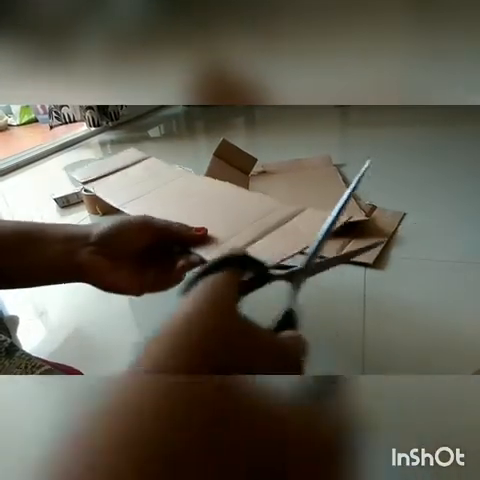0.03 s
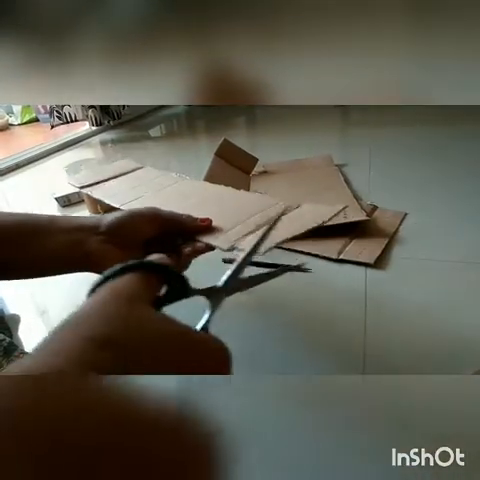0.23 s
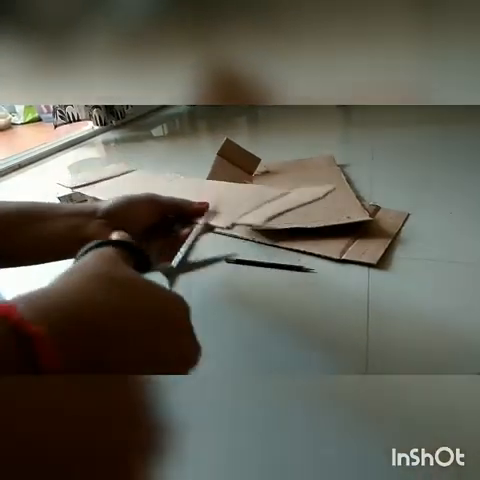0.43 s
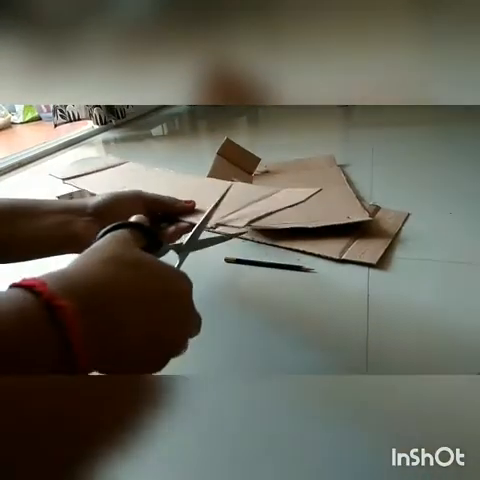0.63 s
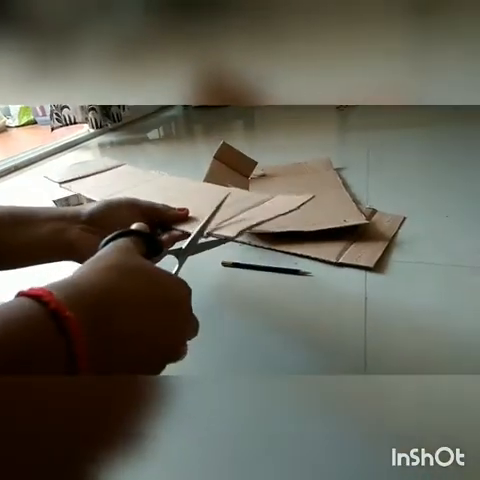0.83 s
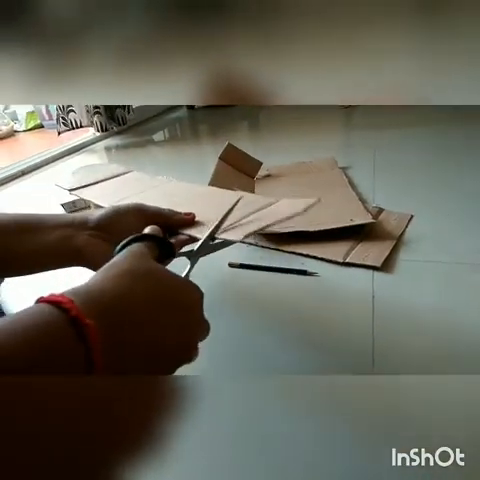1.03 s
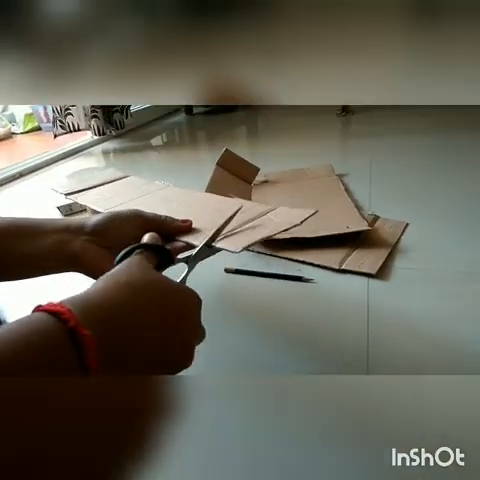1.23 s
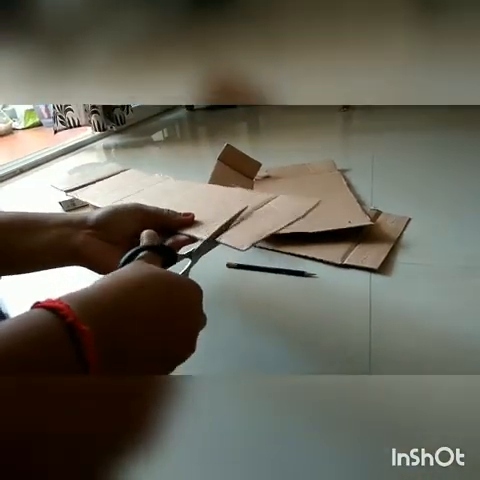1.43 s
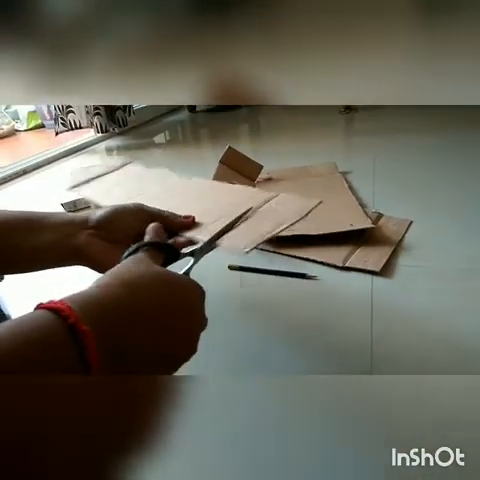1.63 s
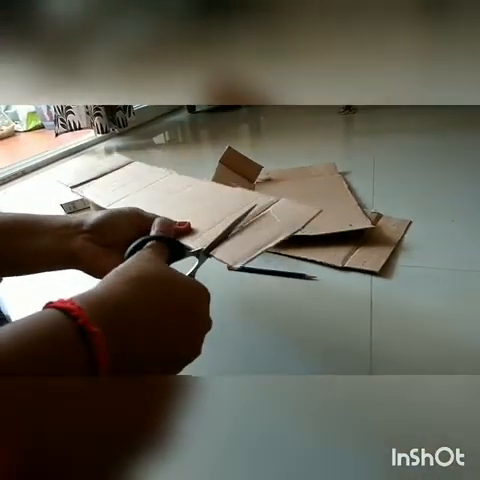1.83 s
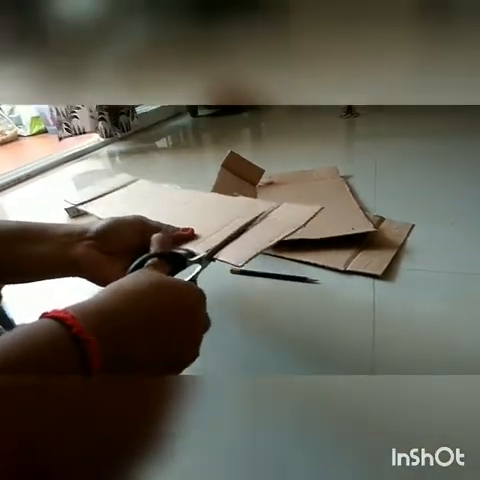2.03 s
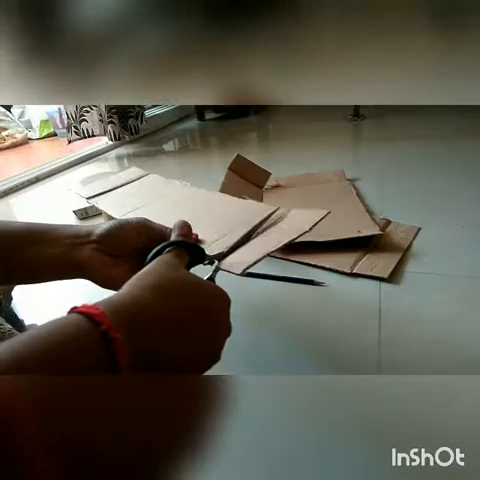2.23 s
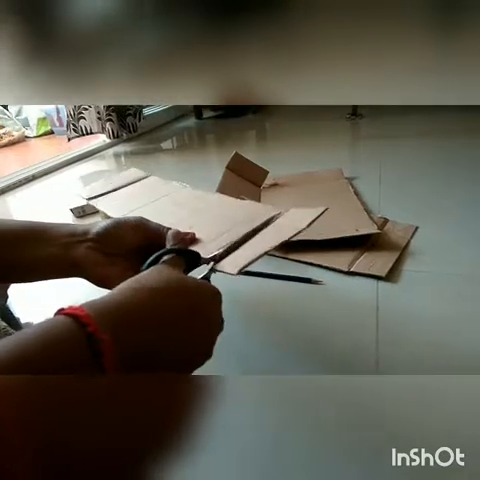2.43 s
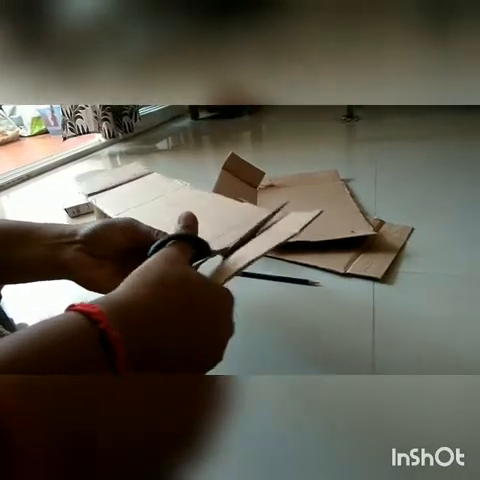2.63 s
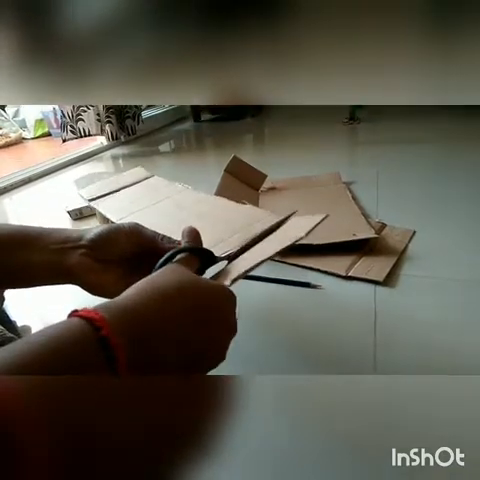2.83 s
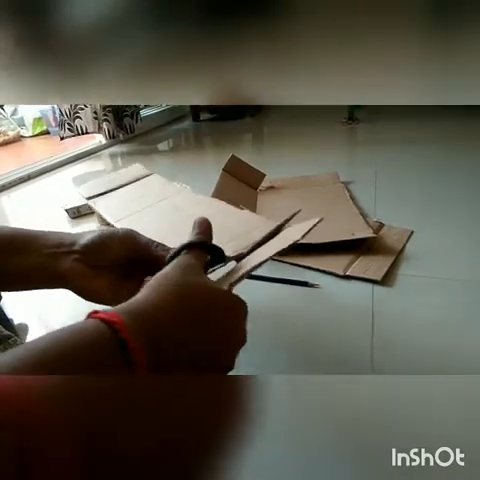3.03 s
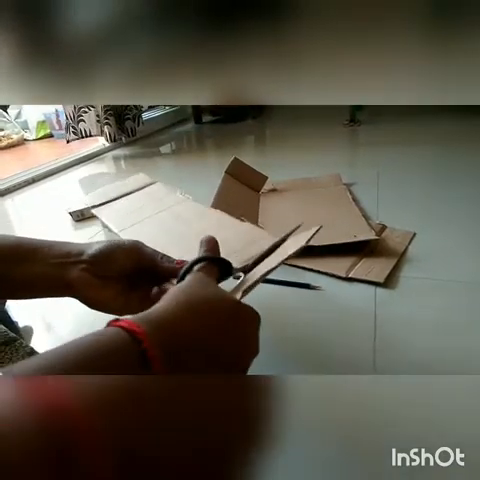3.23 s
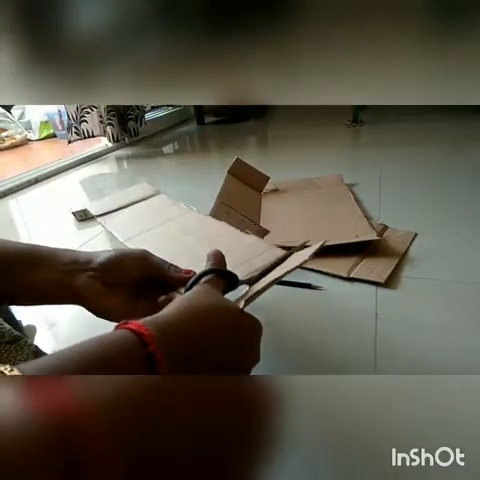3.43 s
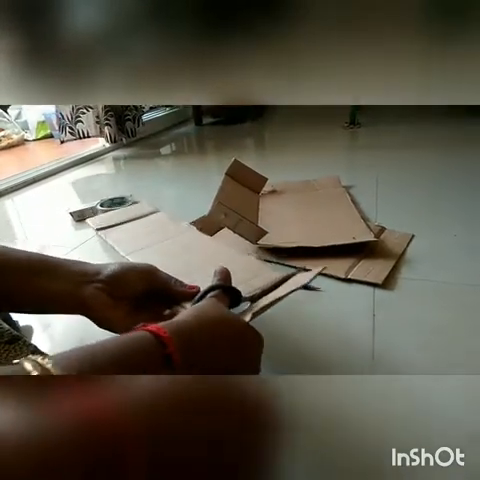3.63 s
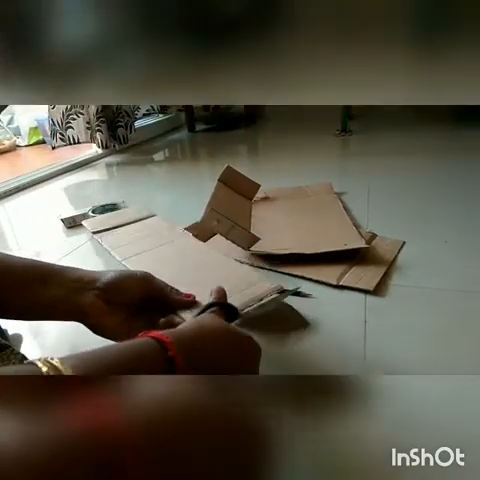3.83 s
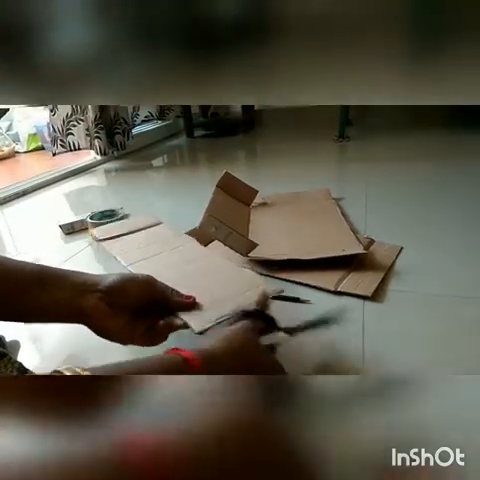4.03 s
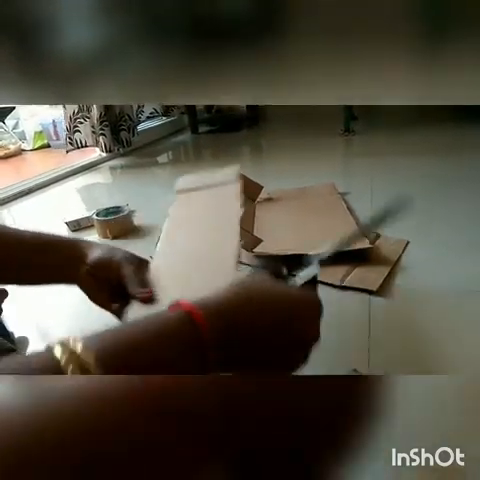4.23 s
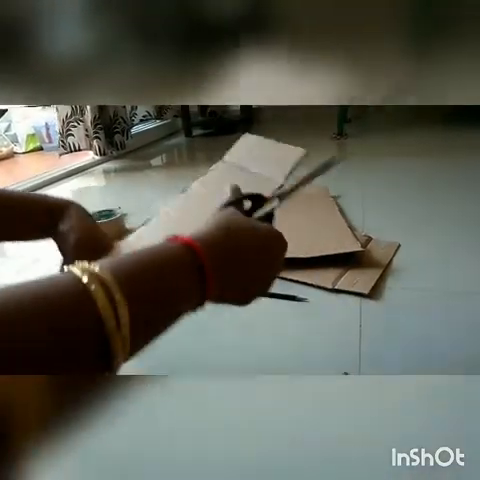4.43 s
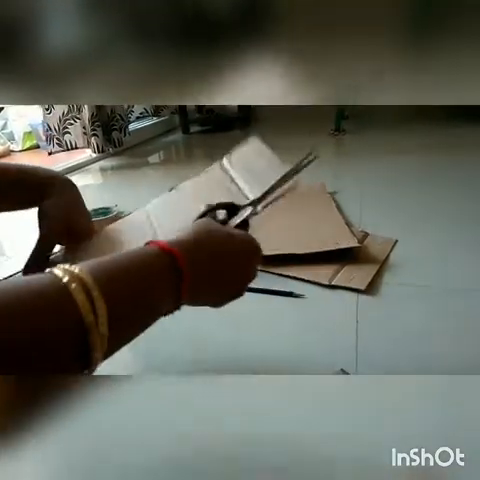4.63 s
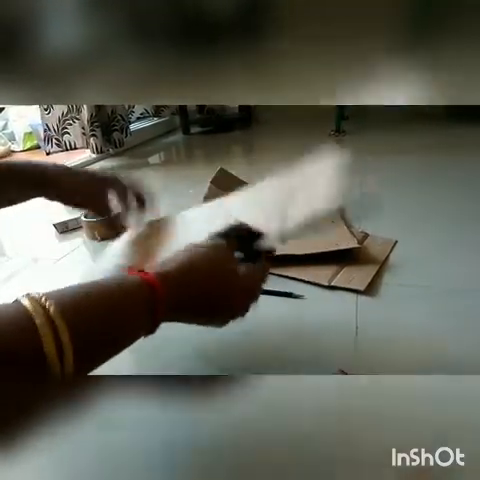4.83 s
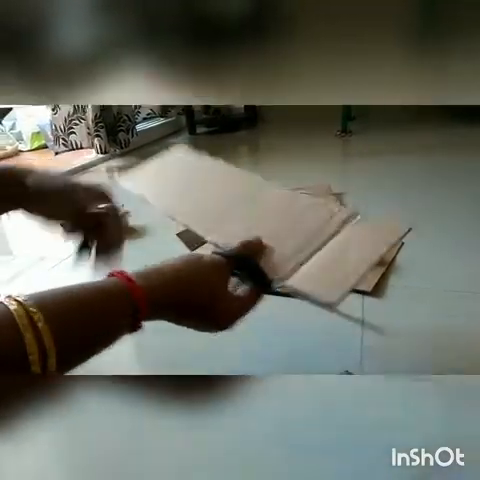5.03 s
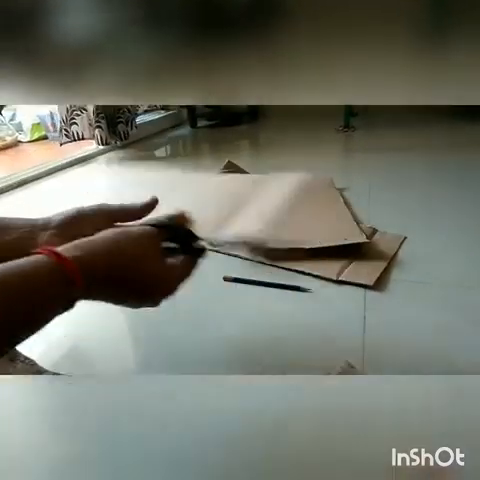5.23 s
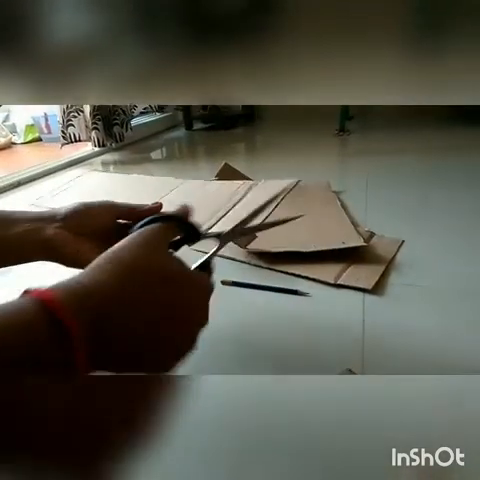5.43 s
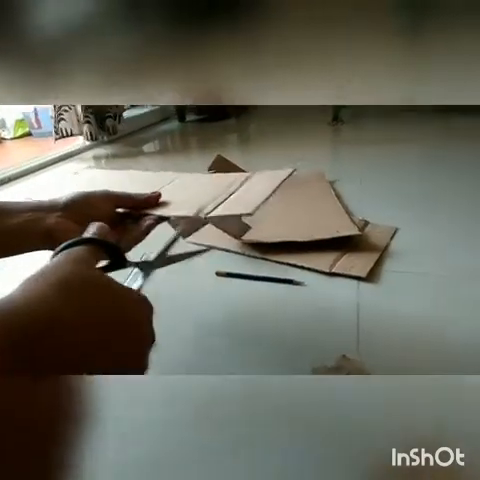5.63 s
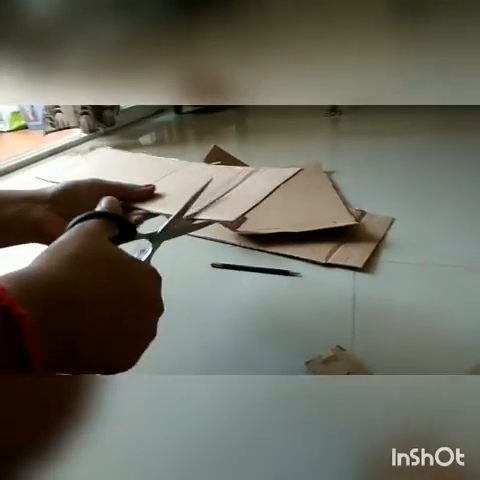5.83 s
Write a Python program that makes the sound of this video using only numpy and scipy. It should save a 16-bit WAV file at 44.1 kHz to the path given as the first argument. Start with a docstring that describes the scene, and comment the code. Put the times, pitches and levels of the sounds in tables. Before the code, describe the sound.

After about a second of muffled distant street noise, dry fibrous snips of scissors in stiff card grow into sharp crackling crunches. A single bright, loud blade snap rings briefly off bare tiles, followed by quick little taps of a fallen piece. Then quiet handling, a hollow card bump and papery scrapes. Close stereo phone pickup, brighter on the left, with low wind-like thumps.

```python
"""A hard, tiled room: close to a phone, scissors bite stroke by stroke through corrugated cardboard. The blades
clap shut, the offcut taps and bounces on the floor, the sheet is turned. Breaking fibres are damped sines
that also drive resonances of the sheet; knocks are decaying tones; decaying noise makes the echoes.
Low-pitched pressure lumps puff at the microphone ports; shaped noise, a hum and a whistle form a far street."""
import sys
import numpy as np
from scipy import signal
from scipy.fft import rfft, irfft, next_fast_len
from scipy.io import wavfile
from scipy.ndimage import uniform_filter1d, map_coordinates

SR = 44100
rng = np.random.default_rng(int(sys.argv[2]) if len(sys.argv) > 2 else 0)


def generate_wav(signal):
    """Clip the signal to [-1, 1] and save it as 16-bit WAV at the path in sys.argv[1]."""
    frames = np.transpose(np.atleast_2d(signal))
    scaled = np.clip(frames, -1, 1) * 32767
    pcm = np.round(scaled).astype(np.int16)
    wavfile.write(sys.argv[1], SR, pcm)


N = 260190

# resonances of the sheet's body: (centre [Hz], width [Hz], gain [dB])
SHEET_MODES = [(500, 170, 10), (918, 300, 19), (1271, 290, -1.5), (1800, 1300, 2)]


def amp(db):
    """Level as a logarithm: decibels to linear gain."""
    return 10 ** (np.asarray(db) / 20)


def unit(x):
    """Normalisation by power: x scaled to rms 1."""
    return x / np.sqrt(np.mean(x ** 2) + 1e-20)


def along(points, hz):
    """Spectral interpolation: (frequency [Hz], value) points joined on a logarithmic axis."""
    f, v = np.transpose(points)
    return np.interp(np.log(hz + 1), np.log(f + 1), v)


def curves(rows):
    """Time envelopes: one value per sample for each column after the time."""
    s, *columns = np.transpose(rows)
    return [np.interp(np.arange(N) / SR, s, column) for column in columns]


def wobble(rate):
    """Band-limited fluctuation: a smooth random curve with `rate` knots per second."""
    knots = rng.standard_normal(int(N * rate / SR) + 4)
    return map_coordinates(knots, [np.arange(N) * rate / SR])


def filtered(x, response):
    """Linear filtering: the spectrum of x times a complex response of frequency."""
    m = next_fast_len(N + SR // 2)
    return irfft(rfft(x, m) * response(np.fft.rfftfreq(m, 1 / SR)), m)[..., :N]


def resonant(x, modes):
    """Modal superposition: x through parallel causal resonances of alternating sign."""
    def response(f):
        total = 0
        for k, (centre, width, db) in enumerate(modes):
            total = total + (-1) ** k * amp(db) * 1j * f * width / (centre ** 2 - f ** 2 + 1j * f * width)
        return total
    return filtered(x, response)


def street():
    """Partial coherence: far traffic through the walls is patchy noise, alike at both ports in the bass."""
    # far noise level: (time [s], level before drift [dB])
    rush_level = [(0, -58), (.7, -60.5), (3, -56), (4.6, -57), (5.9, -54.5)]
    # a low hum that swells once: (time [s], level before wavering [dB])
    hum_level = [(.62, -90), (.8, -61), (1.2, -62.5), (1.4, -99)]
    # faint falling whistle, before wavering: (time [s], pitch [Hz], level [dB])
    whistle = [(0, 2480, -79), (.12, 2430, -70), (.4, 2050, -72), (.62, 1900, -88)]
    # spectral shape of the far noise: (frequency [Hz], relative density [dB])
    spectrum = [(25, -48.5), (60, 2), (200, 1), (520, -1.5), (790, -10.5), (980, -5), (1500, -16),
                (2000, -15), (3200, -22), (6300, -37.5)]
    # coherence of the two ports: (frequency [Hz], left-right correlation [1])
    likeness = [(60, 0.95), (230, 0.9), (460, 0.83), (900, 0.57), (1770, 0)]
    t = np.arange(N) / SR

    # both ports share the same patches of strength in time and frequency
    z = signal.stft(rng.standard_normal((2, N)), nperseg=512)[2]
    field = uniform_filter1d(rng.standard_normal(z.shape[1:]), 3, 0)
    field = uniform_filter1d(field, 10, 1)
    pair = signal.istft(z * amp(2 * unit(field)), nperseg=512)[1][:, :N]

    def mid_side(f):
        # cos(2 angle) is the correlation of mid + side with mid - side
        angle = np.arccos(np.clip(along(likeness, f), -1, 1)) / 2
        return amp(along(spectrum, f)) * [np.cos(angle), np.sin(angle)]

    mid, side = filtered(pair, mid_side)
    drift_db = .6 * wobble(5)
    rush = amp(curves(rush_level)[0] + drift_db) * unit(np.array([mid + side, mid - side]))

    hum = amp(curves(hum_level)[0] + 2 * wobble(12)) * np.sin(2 * np.pi * 64 * t)

    hz, db = curves(whistle)
    phase = 2 * np.pi * np.cumsum(hz * (1 + .022 * wobble(200))) / SR
    flutter_db = np.array([3 * wobble(50), 3 * wobble(50)])  # separate at each port
    sounding = t < whistle[-1][0]
    return rush + hum + sounding * amp(db + flutter_db) * np.sin(phase)


def puffs():
    """Slow pressure fluctuation: lumps of air, weighted between the ports, over faint unrelated buffeting."""
    # air puffing into the ports: (time [s], nominal level [dB], pitch [Hz], left-right difference [dB])
    gusts = [(0.3, -44, 81.6, -30), (2.771, -45, 114, -34), (2.945, -40.5, 94.6, -37), (3.019, -42, 68, 5),
             (3.117, -32, 105, -35), (3.24, -40.5, 93.3, 21), (3.378, -36.5, 75, -34),
             (3.668, -36.5, 101, -40), (4.048, -36, 72.6, -40)]
    swell_s = .009  # time to the top of a puff's envelope
    out, t = np.zeros((2, N + SR)), np.arange(SR // 3) / SR
    for s, db, hz, pan_db in gusts:
        envelope = t / swell_s * np.exp(1 - t / swell_s)
        lump = envelope * np.sin(2 * np.pi * hz * t)
        port_db = np.minimum([[pan_db], [-pan_db]], 0)  # only the weaker port is lowered
        out[:, round(s * SR):][:, :len(t)] += amp(db + port_db) * lump

    low_band = [(25, -39.5), (55, -2.5), (110, -13.0), (300, -53.5)]  # (frequency [Hz], gain [dB])
    low = filtered(rng.standard_normal((2, N)), lambda f: amp(along(low_band, f)))
    gusty = low * amp([4 * wobble(0.77), 4 * wobble(9.2)])
    return out[:, :N] + amp([[-72], [-66]]) * unit(gusty)


def grains(s, hz, size, cycles):
    """Impulsive fracture: one soft-started damped sine per breaking fibre, coloured by the cut edge."""
    # resonances of the cut edge: (centre [Hz], width [Hz], gain [dB])
    edge_modes = [(3100, 1700, 1), (4564, 1070, 3), (5440, 2080, .5)]
    sample = np.arange(96)
    turns = hz[:, None] * sample / SR
    decay = np.exp(-turns / cycles)
    shape = size[:, None] * np.sin(2 * np.pi * turns) * decay * np.minimum(turns, 1)
    places = np.round(s * SR).astype(int)[:, None] + sample
    bare = np.bincount(places.ravel(), shape.ravel(), N + SR)[:N]
    return resonant(bare, edge_modes)


def tearing(count=36000):
    """Stochastic fracture: dense clumped fibre breaks follow each stroke's force and shake the sheet's body."""
    # the blades shear the card: (start [s], length [s], level [dB], pitch [Hz])
    cuts = [(1.088, 0.094, -73.5, 5630), (1.151, 0.11, -65, 5220), (1.277, 0.093, -65.5, 5630),
            (1.328, 0.065, -50.5, 4390), (1.416, 0.22, -55.5, 5460), (1.715, 0.12, -46, 5080),
            (1.936, .07, -55.5, 5800), (1.993, 0.082, -48.5, 5800), (2.21, 0.1, -42, 5140),
            (2.413, 0.055, -42.5, 5430), (2.466, 0.064, -47, 5300), (2.655, .095, -40.5, 4900),
            (2.815, 0.12, -41, 4530), (3.048, .12, -44.5, 4650), (3.268, 0.094, -59.5, 4600),
            (3.343, .06, -53.5, 4950), (3.66, 0.24, -69, 4780)]
    # hands and steel rub over the sheet: (start [s], length [s], level [dB], pitch [Hz])
    rubs = [(-.4, 0.99, -76.5, 4390), (4.26, 0.036, -67, 4520), (4.314, 0.059, -70.5, 3950),
            (4.504, 0.13, -60.5, 4500), (4.553, 1.84, -70, 4260), (4.625, 0.29, -58, 4430),
            (4.768, 0.18, -64, 4720), (4.917, 0.076, -65, 4370), (5.093, 0.31, -69, 4240),
            (5.335, 0.077, -51.5, 4660), (5.403, 0.078, -51, 4780), (5.479, 0.11, -59, 4690),
            (5.645, .17, -61.5, 4230)]
    cut_rise, rub_rise = .3, .45  # share of a stroke spent swelling
    cut_rough, rub_rough = 1.1, .6  # how unevenly the breaks come
    softness = 1.4  # exponent rounding a stroke's ends
    wander = .06  # log-pitch straying of neighbouring breaks together

    t = np.arange(N) / SR
    force, pitch, rough = np.zeros(N), np.full(N, 4600.), np.ones(N)
    strokes = [(*row, cut_rise, cut_rough) for row in cuts]
    strokes += [(*row, rub_rise, rub_rough) for row in rubs]
    for start, length, db, hz, rise, uneven in sorted(strokes):
        ramp = np.interp((t - start) / length, [0, rise, 1], [0, 1, 0])
        force += amp(db) * np.sin(np.pi / 2 * ramp) ** softness
        pitch[t > start], rough[t > start] = hz, uneven  # held until the next stroke

    draw = rng.random((count, 2))
    at = (draw[:, 0] * N).astype(int)
    spread = np.exp(.17 * rng.standard_normal(count))
    own_hz = (pitch * np.exp(wander * wobble(45)))[at] * spread
    size = amp(-2.2 * rough[at] * np.log(draw[:, 1]))  # a few breaks are much larger
    fibres = grains(at / SR, own_hz, size, cycles=3)
    clumps = amp(rough * (3 * wobble(130) + 1.5 * wobble(60)))
    edge = unit(clumps * fibres)
    body = unit(resonant(rng.standard_normal(N) * np.abs(edge), SHEET_MODES))
    return force * (edge + amp(-13.5) * body)


def floor_bounces(x):
    """Early reflection: the floor returns treble-heavy noise that falls 60 dB in 6 ms."""
    decay = amp(-60 * np.arange(220) / SR / .006)
    bounces = np.diff(rng.standard_normal((2, 221))) * decay  # differencing favours the treble
    return .1 * signal.fftconvolve(x[None], bounces, axes=1)[:, :N]


def room(x, delay=0.0081):
    """Reverberation: after a gap tiles and walls answer with thickening, decaying noise, fresh each 1/8 s."""
    # reverberation time: (frequency [Hz], t60 [s])
    t60_points = [(500, 0.51), (4000, 0.41), (7000, 0.35)]
    out, step = np.zeros((2, N + 3 * SR)), SR // 8
    for a in range(0, N, step):
        hz, t, z = signal.stft(rng.standard_normal((3, SR // 2)), SR, nperseg=256)
        decay = amp(-60 * t / along(t60_points, hz)[:, None])
        shared, *own = signal.istft(z * decay, SR, nperseg=256)[1]
        thickening = 1 - np.exp(-np.arange(len(shared)) / SR / 0.00067)
        tail = (0.46 * shared + np.array(own)) * thickening
        wet = signal.fftconvolve(x[None, a:a + step], tail / np.linalg.norm(tail[0]), axes=1)
        out[:, a + round(delay * SR):][:, :wet.shape[1]] += wet
    return out[:, :N]


def snaps(table, count=14):
    """Clustered fracture: each row is a burst of breaks near one pitch, with pushes that ring the sheet."""
    s, db, body_db, hz, length = np.transpose(table)[:, :, None]
    jitter, detune, size = np.moveaxis(rng.standard_normal((len(table), count, 3)), 2, 0)
    place = np.linspace(0, 1, count)
    when = (s + np.clip(length, 0, .03) * (place + 0.14 * jitter)).ravel()
    swell = np.interp(place, [0, .35, 1], [.3, .55, .2])
    gain = amp(db + 2 * size) * np.sign(jitter) * swell
    crack = grains(when, (hz * np.exp(.13 * detune)).ravel(), gain.ravel(), cycles=3.33)
    push = np.bincount(np.round(when * SR).astype(int), (gain * amp(body_db)).ravel(), N)
    height = np.abs(resonant(np.eye(1, N)[0], SHEET_MODES)).max()  # of the ring after one push
    return crack + resonant(uniform_filter1d(push, size=5), SHEET_MODES) / height


def card_snaps():
    """Brittle failure: single snaps of card, each a cluster of breaks spread over about 7 ms."""
    # snaps: (time [s], nominal level [dB], body against it [dB], pitch [Hz])
    breaks = [(1.342, -32.5, -28, 4180), (1.44, -31.5, -19, 5150), (1.482, -48, -19, 5600),
              (1.509, -31, -8.5, 5220), (1.5362, -29.5, -11, 5050), (1.9792, -18.5, -15.5, 5160),
              (2.0144, -22, -25, 4830), (2.026, -24.5, -18, 5570), (2.0746, -26, -13, 5970),
              (2.0855, -24.5, -11, 5250), (2.4265, -29, -11, 5400), (2.4742, -24, -11.5, 4460),
              (2.494, -19.5, -9, 4820), (2.5115, -25.5, -13, 6000), (2.755, -31, -36, 3850),
              (2.8361, -28.5, -15, 6050), (2.849, -29, -8, 3150), (2.8587, -28, -5.5, 3700),
              (2.876, -23.5, -12, 5650), (2.893, -27, -10, 4100), (2.921, -30.5, -14, 3880),
              (2.957, -40, -10, 3560), (3.0991, -35, -30, 3700), (3.1887, -38, 0.5, 4660),
              (3.3154, -27, -9.5, 4750), (3.4537, -29, -7.5, 4810), (3.6691, -31, -9, 6600),
              (3.689, -32, -4, 4930), (4.095, -29, -17, 4530), (4.14, -38, -10, 4600),
              (4.521, -41, -14, 5400), (4.7326, -33.5, -9.5, 4230)]
    return snaps([(*row, .007) for row in breaks])


def knocks():
    """Bending vibration: dull blows of the sheet on hand and floor, a low tone and a weaker overtone."""
    # blows: (time [s], nominal level [dB], pitch [Hz], t60 [s])
    blows = [(3.189, -40, 446, 0.034), (3.668, -52, 248, 0.023), (3.984, -33.5, 373, 0.054),
             (4.217, -48, 243, 0.072), (4.733, -34.5, 480, 0.12)]
    out, t = np.zeros(N + SR), np.arange(SR // 4) / SR
    for s, db, hz, t60 in blows:
        tone = np.sin(2 * np.pi * hz * t) + .3 * np.sin(2 * np.pi * 1.45 * hz * t)
        onset = 1 - np.exp(-t / 0.00074)
        out[round(s * SR):][:len(t)] += amp(db - 60 * t / t60) * onset * tone
    return out[:N]


def blade_clap():
    """Impact: the closing blades give short clusters of damped sines with pushes into the body modes."""
    # impacts: (time [s], nominal level [dB], body against it [dB], pitch [Hz], length [s])
    impacts = [(3.8826, -24, -6, 5500, .003), (3.8856, -8, -18, 4200, .002), (3.889, -21, -24, 3900, .006)]
    return snaps(impacts)


def clap_pulse(order=4):
    """Broadband impulse: the clap as the walls hear it, one push through a steep-flanked resonance."""
    # from all sides the clap blurs to one pulse:
    # (time [s], peak level [dB], centre [Hz], width before the power `order` [Hz])
    blurred_clap = (3.886, -9, 4501, 3001)
    s, db, hz, width_hz = blurred_clap

    def response(f):
        return (1j * f * width_hz / (hz * hz - f * f + 1j * f * width_hz)) ** order

    pulse = filtered(np.eye(1, N, round(s * SR))[0], response)
    return amp(db) * pulse / np.abs(pulse).max()


def offcut_taps():
    """Repeated impact: the offcut's edges tap the tiles in clusters spread over about 3 ms."""
    # taps: (time [s], nominal level [dB], pitch [Hz])
    taps = [(4.167, -20.5, 4450), (4.183, -40, 4100), (4.214, -28, 4300), (4.2868, -30.5, 4140),
            (4.3, -36, 3900), (4.3108, -39.5, 4040), (4.34, -38, 3800), (4.354, -38, 3900)]
    body_db = -17  # the body's push against the tap
    return snaps([(s, db, body_db, hz, .003) for s, db, hz in taps])


def phone_shade(x):
    """Acoustic shadowing: the phone's body sets level and phase between ports; the right one faces away."""
    # level between ports: (frequency [Hz], left-right difference [dB])
    level_points = [(1400, 0), (2400, 5.5), (4000, 12), (6800, 11)]
    # phase between ports: (frequency [Hz], left's lead [rad])
    lead_points = [(3400, -1), (5800, -5)]
    side = np.array([[1], [-1]])
    share = np.minimum(side, 0) + 0.62  # the left rises by 0.62 of the difference, the right falls by 0.38

    def response(f):
        return amp(along(level_points, f) * share) * np.exp(.5j * side * along(lead_points, f))

    return filtered(x, response)


def scene():
    """Superposition: the near work and its echoes are shaded by the phone; air and street add to them."""
    card = tearing() + card_snaps() + offcut_taps() + knocks()
    direct = card + blade_clap()
    near = direct + floor_bounces(direct)
    echo = room(amp(-9) * card + clap_pulse())
    return phone_shade(near + echo) + puffs() + street()


def record(dry):
    """Spectral shaping and soft saturation: bright to 7 kHz, a dip, a thin band near 9.5 kHz; a very faint hiss."""
    # overall colour: (frequency [Hz], gain [dB])
    colour = [(20, -28.5), (45, 1), (6200, 4), (7400, -2.5), (7700, -13), (9500, 1), (10400, -54)]
    x = filtered(dry, lambda f: amp(along(colour, f)))
    x = x / (1 + np.abs(x / .75) ** 4) ** (1 / 4)  # bounded by 0.75
    x = x + amp(-92) * rng.standard_normal(x.shape)  # very faint, even hiss
    top_hz = 13600
    return filtered(x, lambda f: 1 / (1 + (f / top_hz) ** 40))


dry = scene()
out = record(dry)
generate_wav(out)
```